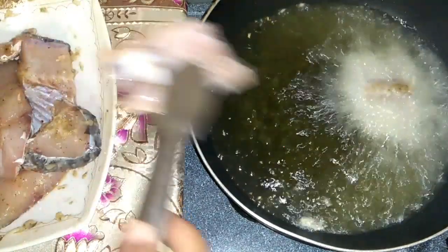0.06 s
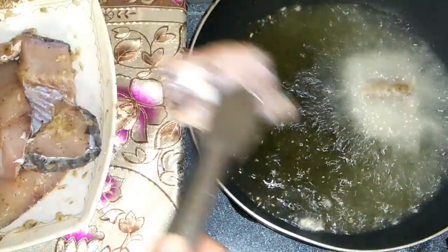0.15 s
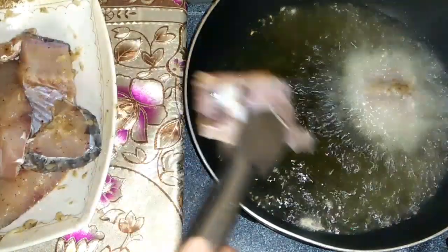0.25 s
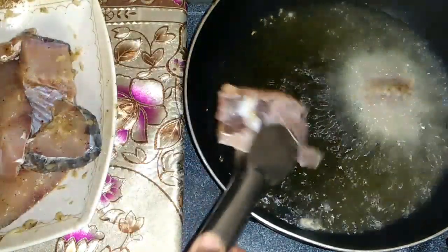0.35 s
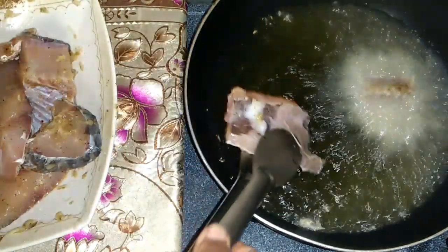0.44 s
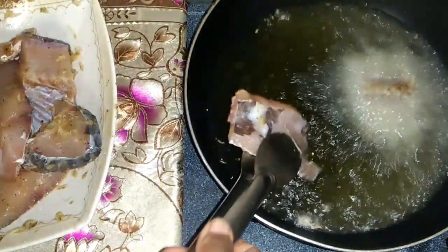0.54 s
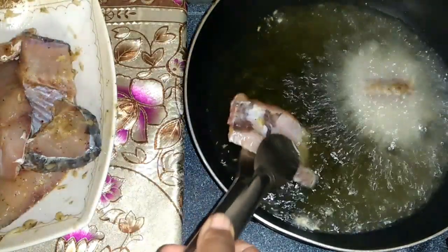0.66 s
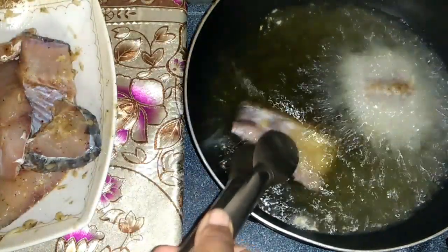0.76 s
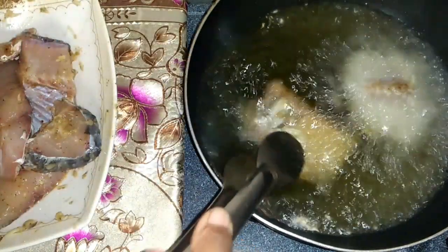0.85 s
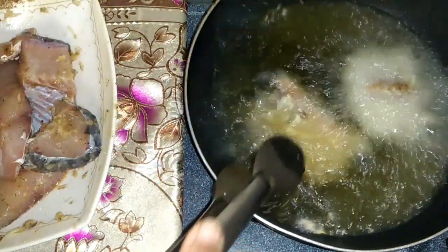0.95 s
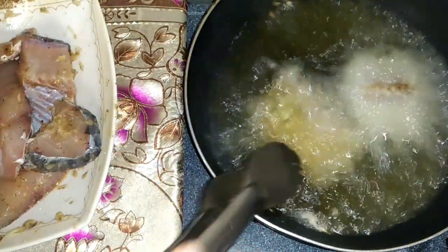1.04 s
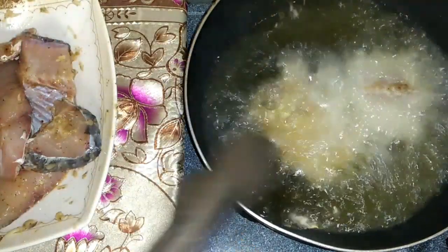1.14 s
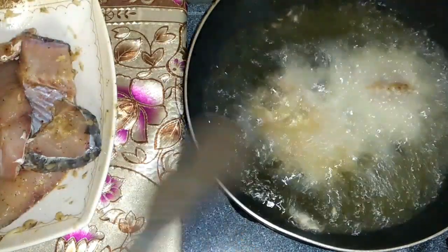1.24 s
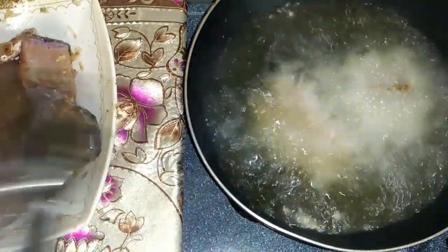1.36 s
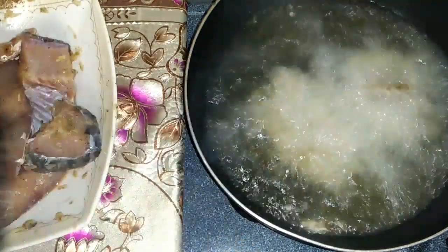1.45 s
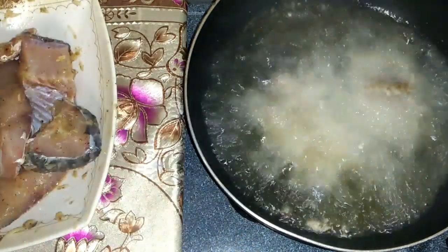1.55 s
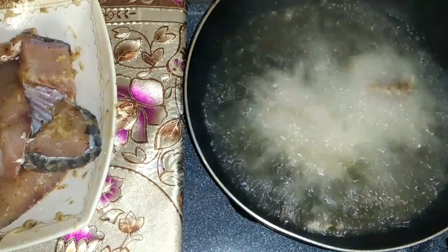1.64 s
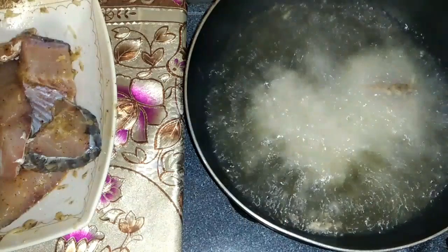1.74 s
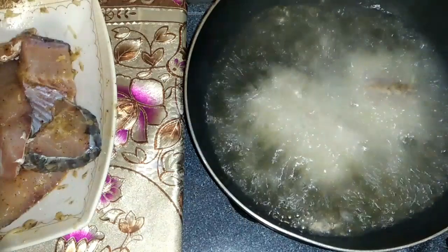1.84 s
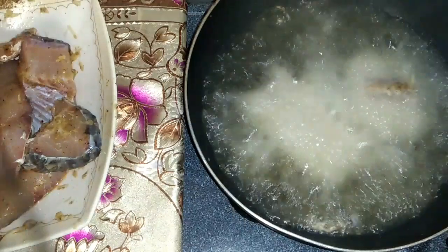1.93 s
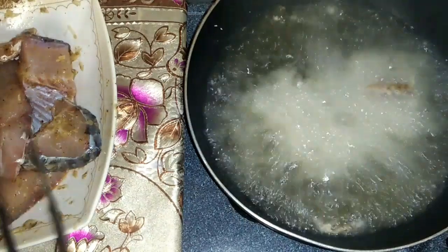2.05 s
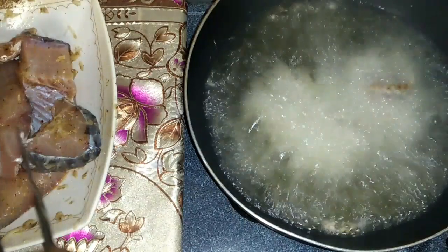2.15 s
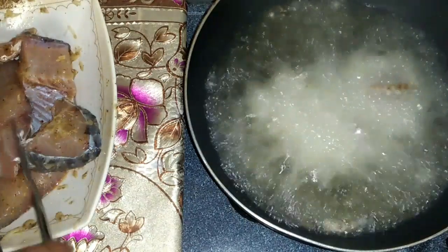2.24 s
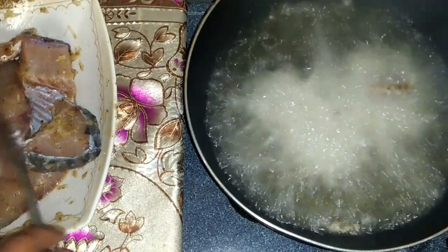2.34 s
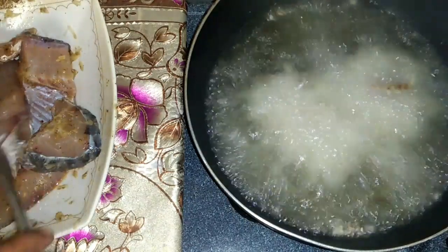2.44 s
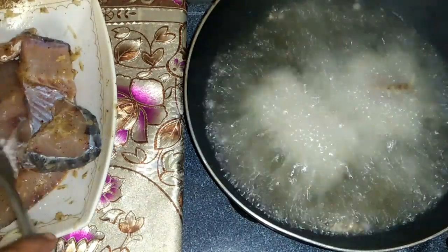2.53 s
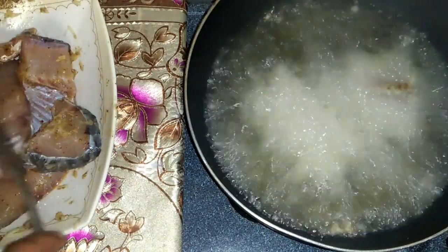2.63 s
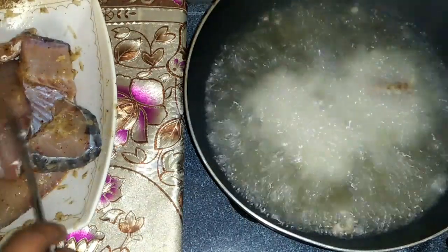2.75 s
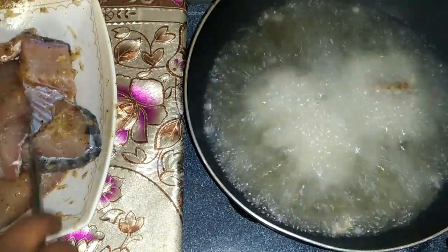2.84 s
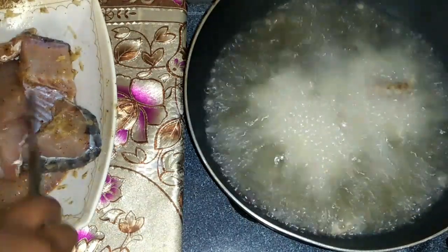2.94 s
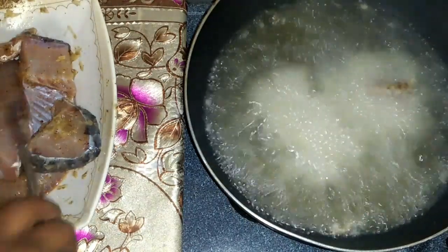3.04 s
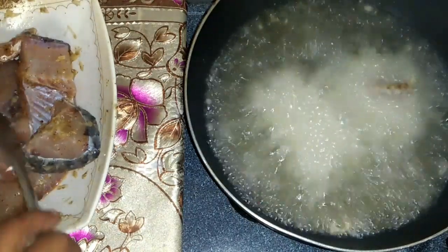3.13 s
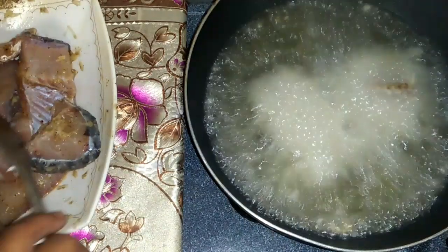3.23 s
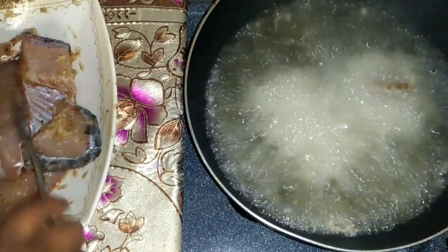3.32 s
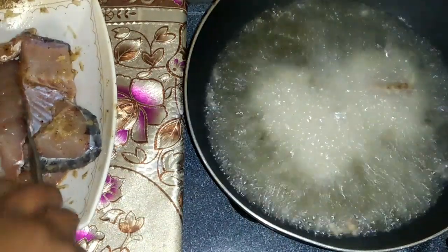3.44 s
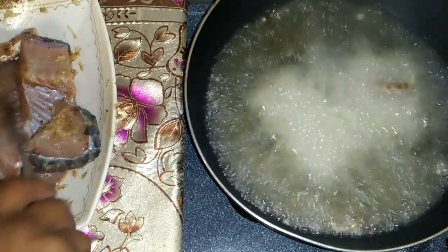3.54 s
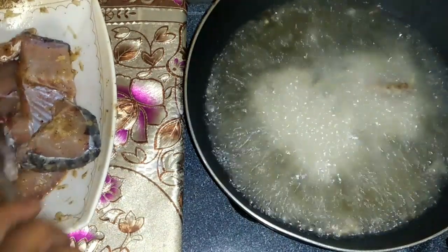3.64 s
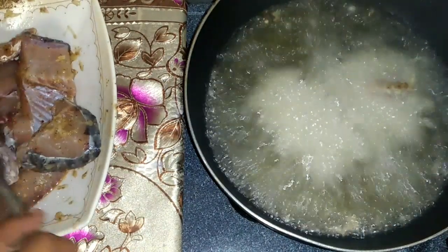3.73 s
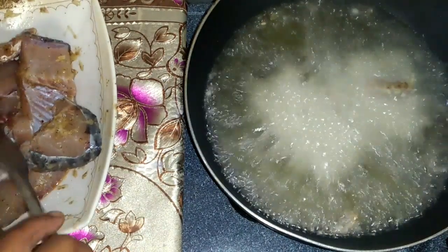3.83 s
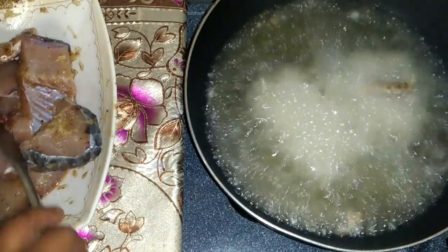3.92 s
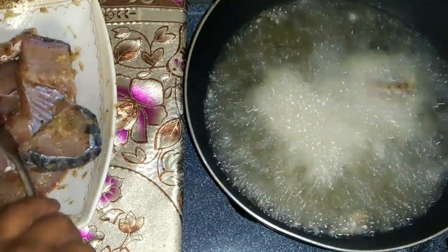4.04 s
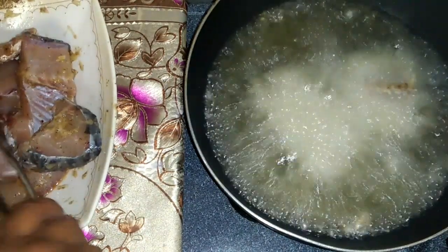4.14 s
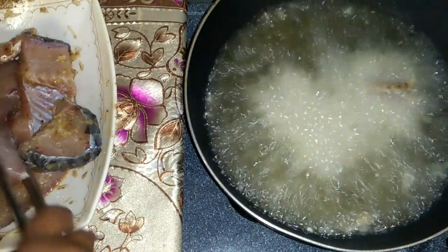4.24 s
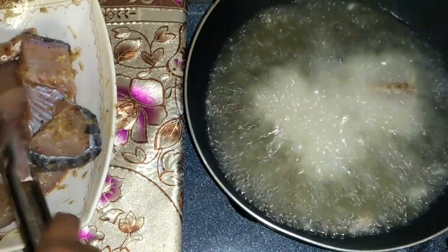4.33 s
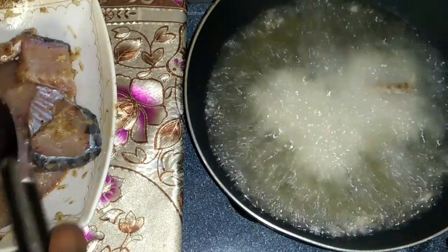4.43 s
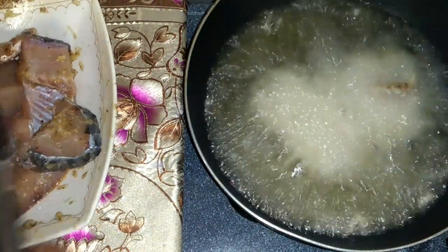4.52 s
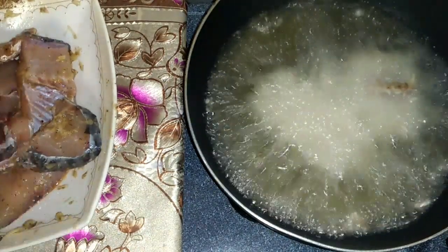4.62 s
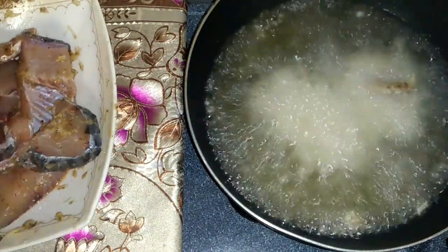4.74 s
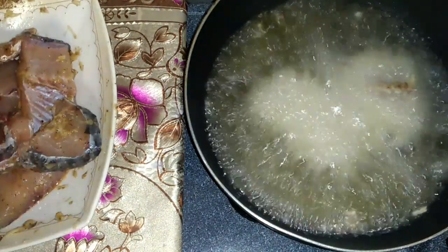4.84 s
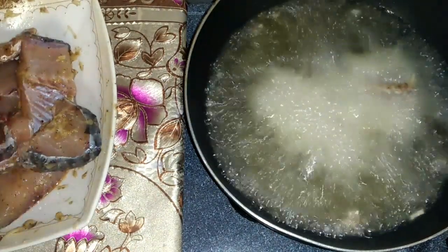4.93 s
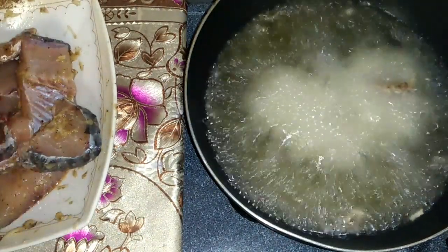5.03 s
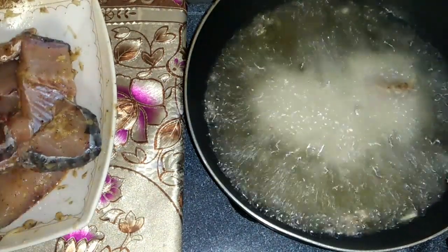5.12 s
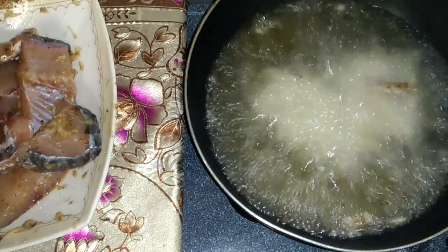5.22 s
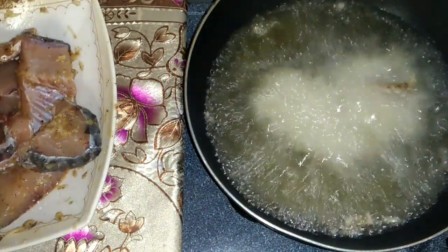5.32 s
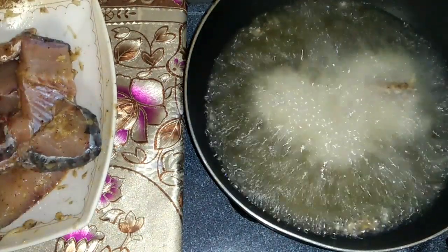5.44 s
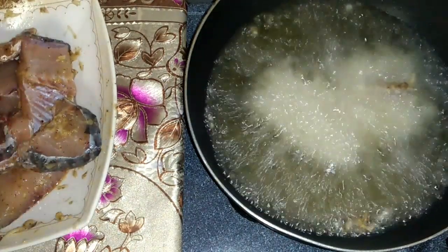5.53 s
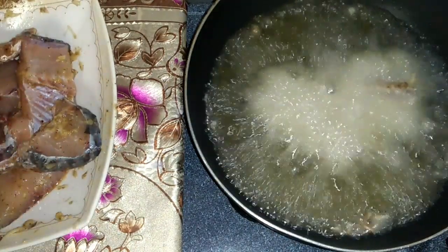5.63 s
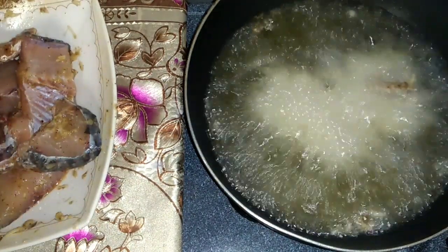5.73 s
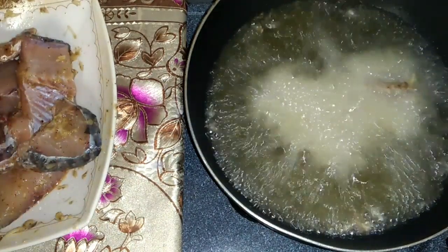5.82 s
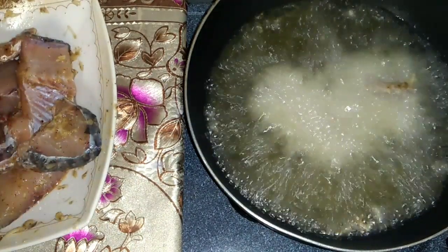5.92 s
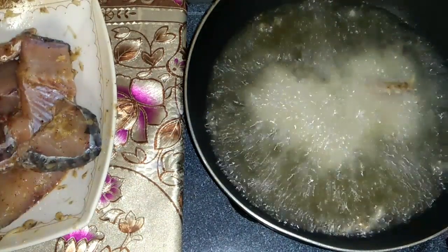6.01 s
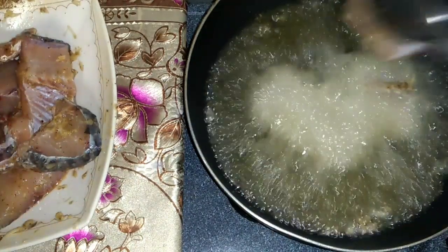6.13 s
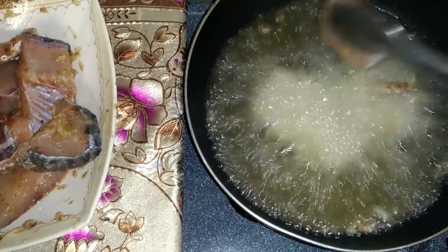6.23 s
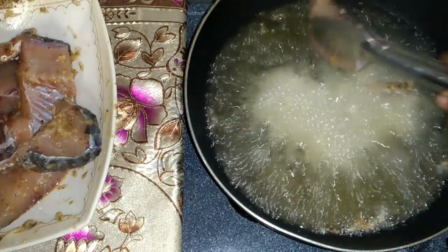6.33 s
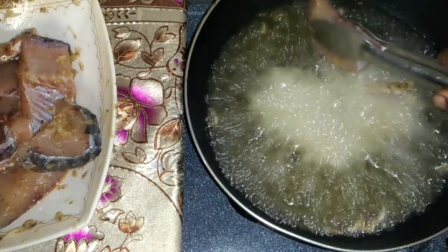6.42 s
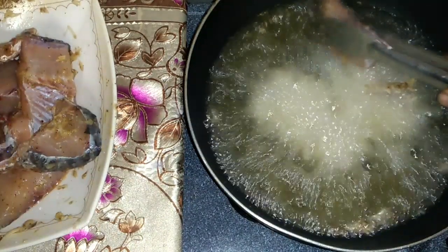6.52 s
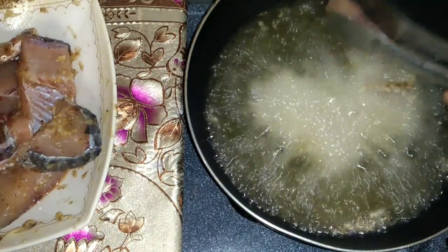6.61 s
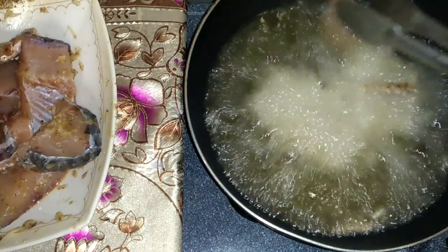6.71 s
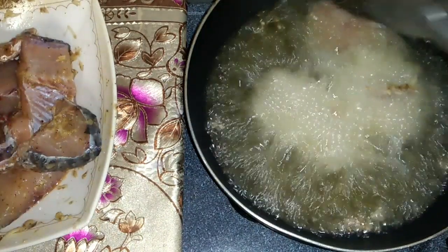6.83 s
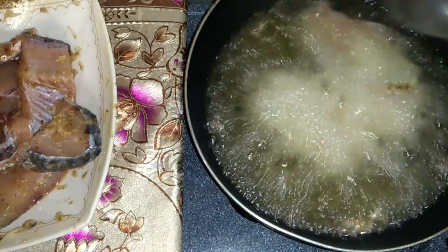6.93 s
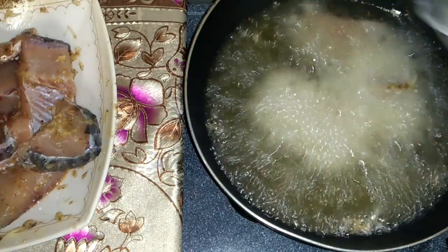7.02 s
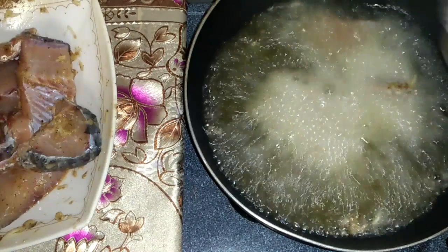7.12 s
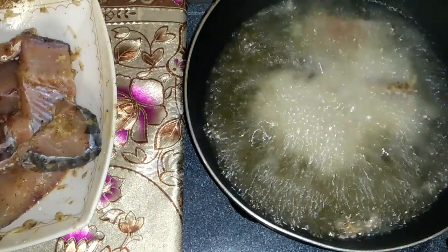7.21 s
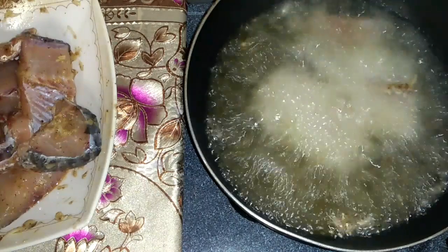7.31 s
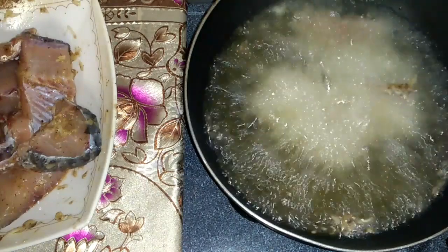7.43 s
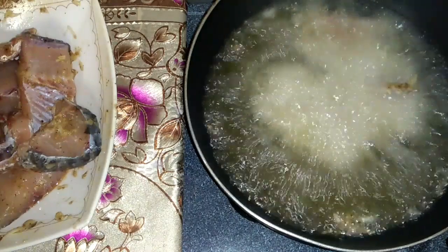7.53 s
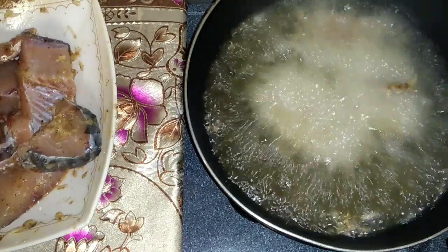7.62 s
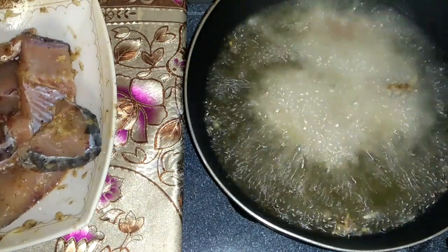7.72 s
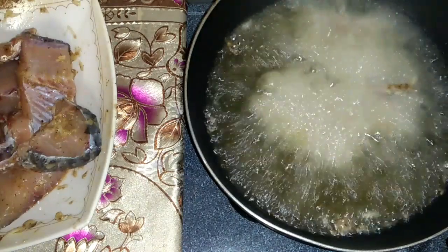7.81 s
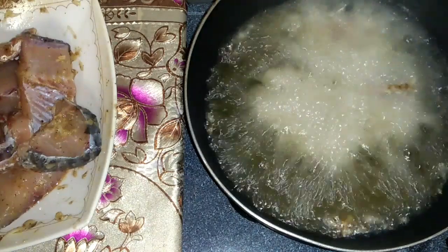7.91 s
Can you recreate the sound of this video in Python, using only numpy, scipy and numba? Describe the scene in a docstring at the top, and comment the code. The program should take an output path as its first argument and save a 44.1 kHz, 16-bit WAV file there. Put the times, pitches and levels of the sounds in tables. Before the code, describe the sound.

Fish fries in a deep pan of hot oil, heard close up in a small kitchen. At first there is a light, fizzing sizzle with scattered pops and spits. At about 0.8 seconds a fresh piece goes in and the boil leaps up, loud and dense, with gurgling large bubbles, spitting small ones and a bright hiss, strongest from 1.3 to 2 seconds. By 3 seconds it has eased into steady frying, dotted with irregular pops and sharp cracks of spattering oil. Near 7 seconds another piece adds a wet crackle and a smaller lift, and the frying carries on to the end at about 8 seconds. The pan and room ring faintly with the bursts. Underneath, the oil churns over a faint dull rumble, and a low hum swells from about 4 seconds, peaking near 6.5. The pan sits centrally, its high fizz spreading left and right.

```python
"""Hot oil sizzles and pops: fish fries in a deep pan in a small kitchen. A fresh piece goes in near 0.8 s
and the boil leaps up; another crackles wetly near 7 s. Steam bubbles burst at the surface: large ones
gurgle, smaller ones spit, the finest fizz, and spatters of oil crack above them. The pan and kitchen
ring with the bursts. Underneath, the oil churns over a dull rumble and a low hum swells in the room."""
import sys
import numpy as np
from scipy import signal
from scipy.io import wavfile
from scipy.ndimage import uniform_filter1d
from numba import njit

SR = 44100
rng = np.random.default_rng(int(sys.argv[2]) if len(sys.argv) > 2 else 0)


def wav_out(sig):
    """Save sig, one row per channel (or a flat mono array), as 16-bit PCM at SR to the path in sys.argv[1]."""
    wavfile.write(sys.argv[1], SR, np.round(np.clip(np.atleast_2d(sig).T, -1, 1) * 32767).astype(np.int16))


N = 351300
HOP = 64  # samples per modulation step


def gain_of(db):
    """Decibels to a factor."""
    return 10 ** (np.asarray(db) / 20)


def unit_rms(x):
    """Scales to rms 1."""
    return x / np.sqrt(np.mean(x ** 2) + 1e-20)


def curve(rows, column=1):
    """One column of an automation table at every sample."""
    rows = np.array(rows)
    return np.interp(np.arange(N) / SR, rows[:, 0], rows[:, column])


def wander(per_s, count=1):
    """Rows of drift-free random modulation near the given rate; rms 1, one value per HOP."""
    size = max(round(SR / HOP / per_s), 1)
    noise = rng.standard_normal((count, N // HOP + 9))
    slow = uniform_filter1d(uniform_filter1d(noise, size), size)
    return unit_rms(slow - uniform_filter1d(slow, 8 * size))


def swells(per_s):
    """One random modulation curve at every sample."""
    return np.repeat(wander(per_s)[0], HOP)[:N]


def equalise(x, points):
    """Minimum-phase EQ through (frequency [Hz], gain [dB]) points."""
    hz, db = np.transpose(points)
    grid = abs(np.fft.fftfreq(16384, 1 / SR))
    eq_db = np.clip(np.interp(np.log(grid + 1), np.log(hz), db), -100, 20)
    response = np.exp(np.conj(signal.hilbert(np.log(gain_of(eq_db)))))
    taps = np.fft.ifft(response).real[:4096]
    return signal.oaconvolve(np.atleast_2d(x), taps[None], axes=1)[:, :N]


def resonate(x, hz, width):
    """A resonance with a gain of about 1 at its centre."""
    r = np.exp(-np.pi * width / SR)
    return 2 * signal.lfilter([1 - r], [1, -r * np.exp(2j * np.pi * hz / SR)], x).real


def band(x, hz, width):
    """Two resonances in series, for steeper skirts."""
    return resonate(resonate(x, hz, width), hz, width)


# Tone of the rumble: (frequency [Hz], gain [dB])
RUMBLE_EQ = [(30, -16.5), (44, -20), (75, -13.5), (86, -9.5), (100, -15.5), (122, -9.5), (150, -12),
             (178, -15), (205, -24), (260, -68), (440, -120)]
# Fader ride of the rumble: (time [s], level [dB])
RUMBLE_LEVEL = [(0.0, -77), (0.69, -60), (1.26, -65.5), (1.48, -55), (3.1, -62), (3.53, -55.5), (6.88, -53),
                (7.5, -61), (7.97, -55)]


def rumble():
    """A dull bed of low noise in uneven swells."""
    noise = unit_rms(equalise(rng.standard_normal(N), RUMBLE_EQ))
    return noise * gain_of(curve(RUMBLE_LEVEL) + 2 * swells(per_s=18))


# Fader ride of the room's hum: (time [s], level [dB])
HUM_LEVEL = [(0.0, -56), (0.38, -76), (0.89, -51), (0.95, -61), (1.6, -66), (2.11, -46.5), (2.62, -50),
             (3.08, -86), (3.57, -48), (3.64, -59), (4.01, -39.5), (4.26, -54), (4.39, -42.5), (4.86, -48),
             (4.88, -42.5), (6.43, -28.5), (7.41, -40.5), (7.45, -34), (7.56, -55), (7.61, -36),
             (7.63, -33), (7.72, -50), (7.81, -31), (7.97, -49.5)]


def hum(hz=56.8, waver_hz=0.58, flutter_db=0.5):
    """A low tone that wavers and flutters, with a faint fuzz under it."""
    turns = np.cumsum(hz + waver_hz * swells(per_s=8.4)) / SR
    tone = np.sqrt(2) * np.sin(2 * np.pi * turns) * gain_of(flutter_db * swells(per_s=8.5))
    fuzz = gain_of(-13) * unit_rms(band(rng.standard_normal(N), hz=48, width=24))
    return (tone + fuzz) * gain_of(curve(HUM_LEVEL))


def echoes(x, t60_s):
    """A short tail of scattered reflections, energy 1."""
    t = np.arange(8000) / SR
    reflections = rng.standard_normal(len(t)) * (rng.random(len(t)) < .3)
    tail = reflections * gain_of(-60 * t / t60_s) * (t > .003)
    return signal.oaconvolve(x, tail[None] / np.linalg.norm(tail), axes=1)[:, :N]


# Resonances of pan and kitchen: (frequency [Hz], width [Hz], gain [dB])
RINGS = [(442, 36, -17), (582.6, 8.4, -0.5), (704, 7.9, 2), (755, 4.9, 6), (873.6, 8.6, 5), (926, 5, -1),
         (922, 134, -11.5), (1026, 3.2, 3), (1230, 5.8, -4), (2050, 9.7, -2.5)]


def ringing(x):
    """The pan and kitchen ring along with the bursts."""
    return sum(gain_of(db) * resonate(x, hz, width) for hz, width, db in RINGS)


# Tone of the churning oil: (frequency [Hz], gain [dB])
CHURN_EQ = [(130, -33), (220, -15), (280, -1.5), (333, 0.5), (371, -16), (415, 4.5), (500, -1.5),
            (650, -39.5), (1100, -120)]


def churn():
    """Oil churns unevenly against the pan, riding the boil; deep pops lift it with the large bubbles."""
    large_db = curve(BOIL, 1)
    lift_db = stirred(large_db) - large_db
    noise = unit_rms(equalise(rng.standard_normal(N), CHURN_EQ))
    return noise * gain_of(curve(BOIL, 6) + lift_db + 2 * swells(per_s=18))


@njit
def bubbles(peak_s, gain, hz, cycles, side, glide):
    """Each bubble swells, rings a few cycles with climbing pitch and dies; rows are mid and side."""
    mix = np.zeros((2, N))
    for k in range(len(peak_s)):
        rise = cycles[k] / 1.7 * SR / hz[k]  # samples to the peak; half height lasts 1.7 times as long
        start = int(peak_s[k] * SR - rise)
        for n in range(max(-start, 0), min(int(4.5 * rise), N - start)):
            age = n / rise
            phase = 2 * np.pi * hz[k] / SR * (n - rise) * (1 + glide * (age - 1))
            wave = gain[k] * (age * np.exp(1 - age)) ** 2 * np.cos(phase)
            mix[0, start + n] += wave
            mix[1, start + n] += side[k] * wave
    return mix


def zone(pitch):
    """Which of five pitch zones a bubble falls in."""
    return np.clip(pitch * 1.2 + 2.5, 0, 4).astype(int)


def blur(centre_hz, octaves, clumps_db):
    """Bursts too small and many to tell apart: a wide wash of noise around the centre pitch."""
    hz, frames = np.fft.rfftfreq(256, 1 / SR)[:, None] + 1, N // HOP + 5
    pitch = np.log2(hz / np.resize(centre_hz[::HOP], frames)) / octaves
    clumps = gain_of(np.take_along_axis(clumps_db[:, :frames], zone(pitch), 0))
    shape = np.exp(-(pitch / 2.2) ** 2) * clumps
    real, imag = rng.standard_normal((2, 2, len(hz), frames))
    return signal.istft((real + 1j * imag) * shape, nperseg=256, noverlap=256 - HOP)[1][:, :N]


# Colour that pan and microphone give every swarm: (frequency [Hz], gain [dB])
SWARM_EQ = [(180, -32), (300, -0.5), (370, -40), (415, -2), (528, -13), (573, -2), (760, -2), (901, -0.5),
            (1110, -0.5), (2120, -3.5), (4840, -7), (13600, -17), (14300, -9.5)]


def swarm(level_db, centre_hz, surge, octaves, cycles, size_spread, clumping, blur_db, count):
    """Random bursts of many pitches, most weak, a few strong; they come up in clumps of like size."""
    when, size, place = rng.random((count, 3)).T
    pitch, length = rng.standard_normal((count, 2)).T
    at, centre_hz = (when * (N - 1)).astype(int), centre_hz * np.ones(N)
    step = at // HOP
    hz = np.clip(centre_hz[at] * 2 ** (octaves * pitch), 300, 16000)
    # Above -37.5 dB a swarm is so dense that its clumps and sizes even out.
    uneven = np.clip(0.5 - 0.02 * (level_db[::HOP] + 37.5), .3, 1)
    clumps_db = clumping * np.resize(uneven, len(surge[0])) * (wander(24, count=5) + 0.68 * surge)
    size_db = -size_spread * np.minimum(2 * uneven[step], 1) * np.log(size + .012)
    gain = gain_of(size_db + clumps_db[zone(pitch), step]) * np.sqrt(hz)
    bursts = bubbles(at / SR, gain, hz, cycles * np.exp(0.54 * length), np.sign(place - .5), glide=.012)
    bursts = unit_rms(equalise(bursts, SWARM_EQ))
    wash = unit_rms(equalise(blur(centre_hz, octaves, clumps_db), SWARM_EQ))
    return gain_of(level_db) * unit_rms(bursts + gain_of(blur_db) * wash)


def stirred(level_db, below_hz=1500, stir_db=-23.5, t60_s=0.15):
    """Adds to a boil level the short flurry of bubbles that each deep pop stirs up."""
    peak_s, db, hz, _ = np.array(POPS, float).T
    kicks, t = np.zeros(N), np.arange(SR // 2) / SR
    np.add.at(kicks, (peak_s * SR).astype(int), (hz < below_hz) * gain_of(db + stir_db) ** 2)
    flurry = signal.oaconvolve(kicks, gain_of(-60 * t / t60_s) ** 2)[:N]
    return 10 * np.log10(gain_of(level_db) ** 2 + abs(flurry))


# Fader ride of the piece that goes in near 7 s: (time [s], level [dB])
FRESH_LEVEL = [(6.85, -70), (7.0, -44), (7.12, -35), (7.2, -41), (7.35, -42), (7.5, -42), (7.6, -43),
               (7.68, -36), (7.76, -53), (7.97, -60)]


def fresh_piece(surge):
    """Fresh fish crackles wetly in a narrow range of bubble sizes."""
    return swarm(curve(FRESH_LEVEL), 3160, surge, octaves=0.25, cycles=11,
                 size_spread=6, clumping=4, blur_db=-7, count=5000)


# How hard each bubble size boils:
# (time [s], large [dB], middle [dB], small [dB], fine [dB], middle pitch [Hz], churn [dB])
BOIL = [(0, -57, -49, -55, -46, 1930, -64), (.3, -48.5, -48, -50.5, -41.5, 2340, -60.5),
        (.55, -51, -48.5, -56, -46.5, 1870, -71), (.79, -50, -45, -49.5, -47, 1910, -57),
        (.83, -46.5, -35.5, -50, -31, 2550, -59), (.9, -39.5, -27, -25.5, -29, 2750, -60),
        (.99, -44.5, -32, -40, -33, 2310, -52), (1.04, -35, -27, -45, -31.5, 2250, -49),
        (1.07, -37, -25, -34, -32, 1930, -55), (1.2, -36.5, -28, -31.5, -30.5, 2000, -47.5),
        (1.35, -29, -28, -28.5, -30, 2120, -46), (1.5, -31.5, -25, -27, -25, 2060, -49),
        (1.84, -26, -26, -30.5, -26.5, 2120, -44.5), (2.0, -27.5, -30, -36.5, -28.5, 1990, -46),
        (2.2, -29.5, -33, -36, -29, 1990, -47.5), (2.4, -31.5, -38.5, -41, -32, 1940, -49),
        (2.57, -37, -39.5, -43, -37, 1880, -53.5), (2.73, -43.5, -37.5, -50, -37, 1890, -54),
        (3.05, -41, -40.5, -47, -37.5, 1910, -58), (3.3, -42, -42.5, -45, -39.5, 1930, -56),
        (3.7, -41.5, -43, -44.5, -41.5, 1880, -57.5), (4.1, -39, -40.5, -48, -42, 1910, -54.5),
        (4.44, -38.5, -39.5, -45.5, -41.5, 1940, -55), (4.75, -38, -42, -47, -45.5, 1850, -51),
        (5.0, -42, -42, -47.5, -45, 1850, -52), (5.3, -48, -40.5, -53, -42, 1770, -54.5),
        (5.6, -43, -43.5, -46.5, -37, 1780, -53.5), (6.1, -41, -42, -51, -41, 2090, -48),
        (6.5, -44.5, -41, -49, -41, 1880, -52.5), (6.9, -43.5, -38.5, -45.5, -43.5, 1810, -52.5),
        (7.03, -35, -41.5, -46.5, -36, 2100, -51.5), (7.3, -43.5, -37, -48, -36.5, 2090, -52),
        (7.55, -43, -38, -45, -33, 2090, -59), (7.75, -40, -36.5, -46, -32, 2010, -48.5),
        (7.97, -46, -36.5, -52, -35.5, 2050, -51.5)]


def sizzle():
    """Each bubble size swells on its own curve; quick surges of steam lift all swarms together."""
    surge = wander(per_s=30)
    large_db, middle_db, small_db, fine_db = (curve(BOIL, k) + 0.7 * swells(5.4) for k in (1, 2, 3, 4))
    large = swarm(stirred(large_db), 915, surge, octaves=0.35, cycles=2,
                  size_spread=3.5, clumping=3.5, blur_db=-6, count=5000)
    middle = swarm(middle_db, curve(BOIL, 5), surge, octaves=0.5, cycles=3.5,
                   size_spread=3.5, clumping=3.5, blur_db=-4.5, count=16000)
    small = swarm(small_db, 4650, surge, octaves=0.71, cycles=7.5,
                  size_spread=4, clumping=2.5, blur_db=-0.5, count=8000)
    crackle = fresh_piece(surge)
    fine = swarm(fine_db, 11040, surge, octaves=0.41, cycles=6.4,
                 size_spread=3.5, clumping=2.9, blur_db=3.5, count=16000)
    return large + middle + small + crackle + fine


# Spatters of oil:
# (time [s], level [dB], centre [Hz], nominal width [Hz], spray length [ms], relative fizz level [dB])
SPATTERS = [(0.071, -16.5, 9700, 5420, 0.5, -23), (0.2267, -23, 8050, 3700.0, 2.9, -15),
            (0.2436, -24, 8350, 2200.0, 0.5, -20), (0.5434, -33, 12000.0, 4400.0, 0.3, -17.0),
            (0.5568, -21, 11100, 4700.0, 0.3, -18), (0.678, -24, 11100, 4500.0, 0.3, -19),
            (1.0373, -12.5, 9600.0, 4600.0, 1.9, -28), (1.047, -19, 10300.0, 5400.0, 1.2, -24),
            (1.352, -13.0, 12500.0, 3500.0, 0.4, -15), (1.5856, -5, 9400, 3400.0, 0.42, -26),
            (2.2086, -15, 12000.0, 4800.0, 0.7, -15), (2.3696, -15, 11300.0, 3300.0, 0.5, -21),
            (2.7085, -24, 8300.0, 3100.0, 0.3, -16), (2.762, -15.5, 12800.0, 3000.0, 0.6, -17.0),
            (2.7797, -21, 9900.0, 4200.0, 0.4, -15), (2.9944, -27, 12200.0, 4000.0, 1.3, -17.0),
            (3.032, -9.5, 10500, 5900, 2.2, -23), (3.0575, -16, 9200, 3300.0, 0.3, -16),
            (3.096, -23, 11100.0, 3200.0, 0.4, -17.0), (3.1064, -19.5, 9300.0, 4400.0, 0.7, -16),
            (3.477, -26, 10300.0, 4300.0, 0.3, -20), (3.554, -16.5, 12400.0, 3900.0, 0.68, -20),
            (3.582, -27, 11700.0, 4300.0, 0.3, -15), (3.928, -27, 8300.0, 4800.0, 1.7, -22),
            (4.786, -25.5, 8040, 3900.0, 1.8, -11), (5.05, -19, 11000, 6500, 0.2, -22),
            (5.1455, -27, 10600, 3700.0, 0.3, -17.0), (5.1605, -26, 8850, 2400, 0.4, -20),
            (5.1657, -25, 8700.0, 2400.0, 1.4, -13), (5.2308, -26, 8700, 2400, 0.4, -16),
            (5.2551, -24, 8100, 2400, 0.5, -17), (5.2972, -24, 5600.0, 3400.0, 0.4, -24),
            (5.3705, -28, 8200.0, 3100.0, 0.3, -15), (5.4127, -13.5, 7200.0, 4800.0, 0.7, -35),
            (5.4237, -22, 9600.0, 2700.0, 0.87, -29), (5.443, -22, 8300.0, 1900.0, 0.5, -23),
            (5.5204, -22, 8300.0, 2800.0, 0.9, -18), (5.5719, -13, 6600.0, 4630, 1.3, -22),
            (5.714, -25, 8900.0, 2000.0, 0.6, -27), (5.7979, -16, 8600, 2800.0, 0.63, -15),
            (5.8043, -28, 9200.0, 2200.0, 1.9, -15), (6.327, -22, 9200.0, 5100.0, 1.0, -18),
            (6.343, -19, 12500.0, 3700.0, 1.2, -26), (6.4913, -16, 8600.0, 5000.0, 1.9, -23),
            (6.6453, -26, 12700.0, 3600.0, 0.6, -16), (6.6564, -24.5, 12400.0, 2580, 0.7, -15),
            (6.6624, -30, 9900.0, 2800.0, 0.9, -17.0), (6.6702, -27, 11300.0, 2800.0, 0.4, -20),
            (6.8014, -27, 10100.0, 6300.0, 0.3, -14), (6.886, -25.5, 7800.0, 2700.0, 0.3, -16),
            (6.9914, -24, 9600.0, 3200.0, 0.6, -20), (7.0117, -8.0, 11400.0, 2500.0, 0.5, -34),
            (7.0207, -23, 8600.0, 2700.0, 0.7, -29), (7.2879, -20, 8500.0, 3400.0, 0.7, -19),
            (7.299, -22, 9000.0, 3600.0, 1.1, -18), (7.739, -14.5, 9450, 2400.0, 0.7, -16.5),
            (7.772, -19, 11300.0, 5000.0, 1.5, -23)]


def spatters(lead_in_s=0.0014, fizz_t60_s=0.16, side=0.59):
    """A sharp crack amid a short spray of tiny bursts; the droplets fall back and fizz on faintly."""
    length, lead = 6000, 200  # samples in all, and before the crack
    out, t = np.zeros((2, N + length)), (np.arange(length) - lead) / SR
    for at_s, db, hz, width, spray_ms, fizz_db in SPATTERS:
        noise = rng.standard_normal((2, length))
        swell = np.exp(np.minimum(t, 0) / lead_in_s)
        spray = noise * np.where(t < 0, swell, gain_of(-8 * (1000 * t / spray_ms) ** 4))
        crack = (t == 0) * np.sign(noise[:, :1]) * gain_of(6) * np.sqrt(SR / width)
        burst, hiss = band(np.array([spray + crack, noise]), hz, 1.4 * width)
        fizz = unit_rms(hiss) * gain_of(fizz_db - 60 * t / fizz_t60_s) * np.clip(t / 0.0027, 0, 1)
        sound = gain_of(db) * (burst / abs(burst[0]).max() + fizz)
        start = round(at_s * SR) - lead
        out[:, start:start + length] += sound * [[1], [side]]
    return out[:, :N]


# Loud bubbles, often several to a burst: (peak time [s], level before EQ [dB], pitch [Hz], length [cycles])
POPS = [(0.0852, -37.5, 3800, 3.7), (0.1336, -32, 4930, 13), (0.1427, -32, 4380, 11),
        (0.1495, -30, 1630, 7.1), (0.1734, -27.5, 2330, 4.6), (0.277, -24, 2650, 8.7),
        (0.4222, -34, 4200, 14), (0.4602, -38, 4030, 11), (0.5033, -31, 4650, 18), (0.5333, -29, 1900, 4.7),
        (0.567, -21, 1350, 4.1), (0.5691, -20.5, 690, 2.8), (0.5798, -17.5, 1650, 2.3),
        (0.61, -35, 1580, 7), (0.6224, -28, 740, 4.1), (0.6315, -24, 2060, 5.1), (0.6449, -36, 4360, 11),
        (0.6723, -19, 740, 1.8), (0.6988, -36, 5470, 6.6), (0.7304, -14.5, 1420, 2.8),
        (0.7314, -17, 2000, 4.3), (0.7322, -16.5, 720, 2.1), (0.8357, -22, 2780, 9.1),
        (0.868, -22, 3000, 5), (0.885, -14, 2520, 6.3), (0.889, -17, 2050, 6), (0.8978, -13.5, 2820, 6.4),
        (0.91, -19, 4140, 8), (0.9178, -12, 3300, 4), (0.9298, -17, 1880, 6.9), (0.9672, -14.5, 4040, 3),
        (0.9895, -17, 3050, 4.6), (1.008, -19, 3970, 9.7), (1.0193, -18, 1760, 5.5),
        (1.0529, -13.5, 880, 3.4), (1.0641, -13, 960, 2), (1.0704, -8, 1770, 2.3), (1.0787, -14, 1700, 4.4),
        (1.1176, -11, 2740, 3.2), (1.1298, -18, 1070, 4.6), (1.1412, -15, 2500, 4.5),
        (1.147, -18, 870, 5.1), (1.162, -7, 1570, 6.7), (1.2443, -12, 1010, 2.6), (1.2507, -18.5, 4060, 20),
        (1.265, -15, 1010, 4.5), (1.2685, -12, 2180, 3), (1.296, -15, 920, 3.7), (1.311, -14, 860, 3),
        (1.3208, -14, 2420, 7), (1.334, -23, 890, 1.6), (1.335, -15, 1680, 9.6), (1.3558, -15, 1640, 5.4),
        (1.3633, -12, 920, 2.9), (1.3815, -12, 990, 2), (1.381, -9, 2300, 2), (1.4432, -6.5, 2400, 2.9),
        (1.466, -3, 1120, 1.7), (1.4798, -18, 910, 1), (1.527, -11, 1010, 2.3), (1.5276, -17, 2160, 6.9),
        (1.5478, -9, 925, 2.7), (1.5591, 0.5, 2110, 1.2), (1.5715, -5.5, 1010, 4.2), (1.5881, -6, 1010, 3),
        (1.6374, -14, 2970, 7.1), (1.6611, -9, 980, 3), (1.6723, -2.5, 1000, 1.4), (1.6998, -19, 3220, 5.3),
        (1.7361, -16.5, 2230, 12), (1.7435, -23, 1000, 1.4), (1.7837, -12.5, 2990, 6.4),
        (1.8, -15.5, 3450, 8.5), (1.8204, -17, 1550, 2.8), (1.8378, -10.5, 870, 1.6),
        (1.8415, -19, 5570, 7), (1.8425, -2, 1650, 1.3), (1.8683, 0, 1170, 0.88), (1.9266, -8, 1950, 2.1),
        (1.9444, -7, 1010, 1.6), (2.0683, -13, 2110, 2.4), (2.1244, -18.5, 3300, 6), (2.1312, -7, 920, 1.2),
        (2.1714, -21, 2230, 7), (2.1734, -17, 1590, 3.8), (2.1752, -22, 890, 2), (2.1827, -21, 3080, 4.5),
        (2.1986, -12.5, 910, 2.3), (2.1984, -21, 1510, 5.7), (2.2387, -16, 830, 6.3),
        (2.2618, -14, 860, 1.2), (2.2991, -13, 1480, 2.7), (2.3133, -17, 830, 2.5), (2.34, -15, 1710, 3.6),
        (2.3754, -17.5, 870, 5.8), (2.4056, -19, 1690, 5), (2.414, -14, 910, 2.5), (2.4767, -20, 1600, 3.2),
        (2.5493, -30, 3090, 5.2), (2.5541, -15, 910, 2.7), (2.5693, -28, 3130, 5.7), (2.5812, -36, 6420, 6),
        (2.6067, -8, 840, 2.1), (2.6897, -14, 915, 2), (2.7137, -34, 4480, 11), (2.7293, -30, 4340, 12),
        (2.7386, -13.5, 1450, 2.8), (2.7751, -24, 2320, 4), (2.8358, -19, 2450, 7),
        (2.889, -16.5, 895, 1.3), (2.8917, -23, 2700, 4.7), (2.9175, -9, 1000, 0.85),
        (2.9464, -26, 2960, 5.4), (3.048, -18.5, 990, 2.8), (3.0743, -13, 780, 2.8),
        (3.1882, -19, 865, 1.9), (3.2454, -20.5, 830, 4.7), (3.2605, -18, 840, 3.8),
        (3.2905, -23.5, 3130, 7.1), (3.3045, -23, 900, 2), (3.319, -22, 1540, 1.9), (3.343, -17, 1590, 5.9),
        (3.4194, -20.5, 850, 1.8), (3.442, -24, 1010, 3.2), (3.464, -27.5, 3640, 14),
        (3.495, -19.5, 2940, 2.1), (3.5098, -17, 1100, 3), (3.5172, -25, 1560, 3.4), (3.532, -16, 730, 1.5),
        (3.61, -20, 990, 6.1), (3.6232, -10.5, 930, 0.83), (3.663, -25.5, 3230, 7.8),
        (3.7061, -30, 2580, 8), (3.7234, -21, 990, 2), (3.7998, -21, 970, 3.3), (3.8694, -9.5, 1080, 1.7),
        (3.903, -19, 1720, 7.4), (3.9317, -23.5, 4150, 17), (3.9728, -16, 1010, 2.6),
        (3.9726, -27, 2300, 5.6), (3.9736, -28, 6110, 6), (4.047, -17.5, 1880, 3.9),
        (4.0891, -13, 990, 5.7), (4.177, -17, 915, 3.2), (4.177, -23, 1850, 2.3), (4.208, -22, 1620, 2.9),
        (4.2933, -19, 920, 6.1), (4.3072, -19, 930, 3.8), (4.3358, -37, 4840, 14), (4.378, -9, 1190, 0.63),
        (4.3876, -23, 1944, 22), (4.4446, -32, 4380, 14), (4.4519, -14, 876, 3.7), (4.512, -21.5, 1920, 11),
        (4.5094, -38, 4250, 12), (4.5163, -32, 6130, 7.3), (4.567, -17, 896, 5.8), (4.6207, -22, 1720, 2.5),
        (4.6346, -36, 2330, 3.9), (4.6572, -34, 2340, 3.8), (4.753, -19, 975, 7.3),
        (4.7526, -20.5, 1380, 13), (4.7585, -17, 990, 1.4), (4.8005, -26, 1400, 9), (4.8114, -22, 1380, 11),
        (4.844, -11.5, 920, 0.99), (4.8931, -29, 3080, 6), (4.8988, -19.5, 876, 2.6),
        (4.9626, -21, 1000, 1.6), (5.0184, -13, 920, 2.5), (5.021, -34, 4400, 18), (5.0234, -24, 2460, 3.7),
        (5.0498, -31, 890, 2.3), (5.0567, -16, 970, 1.6), (5.0698, -20, 1480, 4.3), (5.08, -20, 1410, 7.9),
        (5.189, -15, 1250, 4.7), (5.2089, -26, 1430, 4), (5.2345, -20, 1390, 3.5),
        (5.298, -21.5, 2200, 6.3), (5.2973, -12, 970, 2.5), (5.2974, -11, 4800, 2.2),
        (5.33, -24, 3620, 5.4), (5.3307, -20, 950, 2.7), (5.4131, -6.5, 1290, 2.3),
        (5.4144, -19.5, 2290, 8.2), (5.4147, -14.5, 4200, 2.5), (5.5316, -38, 6450, 8),
        (5.5713, -16, 740, 1.4), (5.5713, -15.5, 5100, 3.5), (5.5734, -17.5, 4200, 6.2),
        (5.5922, -23.5, 1400, 13), (5.6809, -25.5, 1930, 7.9), (5.7774, -25, 1390, 11),
        (5.7923, -15.5, 1170, 2.2), (5.829, -22.5, 3100, 8.8), (5.839, -22, 5300, 6.4),
        (5.8937, -8.5, 1090, 1.9), (5.8936, -16, 2050, 5.8), (5.8942, -10.5, 3000, 1.6),
        (5.912, -23, 2090, 8.1), (5.9759, -15.5, 940, 3.4), (5.992, -16, 4150, 1.1),
        (6.108, -22.5, 920, 3.9), (6.1578, -11.5, 1070, 2.9), (6.1977, -15, 880, 1.8),
        (6.2234, -22, 900, 4.2), (6.2684, -14, 1020, 1.3), (6.2837, -26, 990, 2.6),
        (6.3401, -27, 4570, 5.9), (6.3414, -20.5, 870, 1.9), (6.3634, -20, 1940, 4.4),
        (6.4922, -14, 1330, 3.5), (6.4946, -15.5, 4100, 1.7), (6.5121, -13.5, 1010, 1.2),
        (6.512, -13, 1880, 1.5), (6.546, -22, 980, 1.2), (6.7246, -19.5, 1304, 9.8),
        (6.757, -20, 1150, 3.5), (6.848, -21, 1840, 9.3), (6.8644, -22, 970, 2.9), (6.8874, -18, 1460, 2.6),
        (6.903, -25.5, 5160, 13), (6.9446, -30, 6050, 5.5), (6.9606, -10, 1120, 1.4),
        (6.967, -16, 1050, 2.3), (6.9878, -19, 1010, 4.2), (7.005, -23, 3560, 4), (7.013, -20, 3100, 8.9),
        (7.0249, -31, 6150, 6.7), (7.0533, -12, 1100, 2.3), (7.0627, -15.5, 3140, 3.9),
        (7.0661, -26, 6310, 7), (7.1117, -20, 2970, 6.5), (7.1237, -14, 3130, 2.9), (7.144, -18, 1560, 3.5),
        (7.1728, -20, 2720, 3.5), (7.2327, -15, 2350, 1.4), (7.234, -8.5, 1010, 1.15),
        (7.2374, -26, 3160, 14), (7.268, -17, 1660, 2.7), (7.27, -17.5, 2560, 7.9), (7.2987, -19, 910, 4.6),
        (7.3133, -12.5, 4500, 2.3), (7.361, -23, 2740, 2.8), (7.4325, -20, 2720, 5.1),
        (7.499, -14, 3060, 8.3), (7.514, -21.5, 860, 4.1), (7.5289, -22, 3240, 11), (7.5387, -22, 3140, 9),
        (7.5897, -23.5, 4130, 10.2), (7.6134, -15, 1350, 1.9), (7.6403, -22, 880, 3.9),
        (7.6464, -29, 4550, 9), (7.6696, -15, 3300, 3.4), (7.684, -19, 3100, 3.9), (7.7355, -26, 3290, 7.8),
        (7.7545, -3.5, 980, 2), (7.768, -19, 900, 6.8), (7.8183, -26, 3060, 7.5), (7.8207, -17, 970, 3.6),
        (7.9424, -17.5, 970, 6)]
# Tone of the loud bubbles, thin in the bass: (frequency [Hz], gain [dB])
POP_EQ = [(100, -14), (300, -11), (700, -7.5), (14300, 2)]


def pops(count=30, lead_db=-25.5):
    """Loud single bubbles, each amid a ragged cluster of weaker ones of like size."""
    peak_s, db, hz, cycles = np.array(POPS, float).T[:, :, None]
    is_weak = np.arange(count) > 0  # bubble 0 is the pop itself
    lag, size, pitch = rng.standard_normal((len(POPS), count, 3)).transpose(2, 0, 1) * is_weak
    trail_db = -20 + 0.4 * np.log2(hz / 1000)
    gains = gain_of(db + (lag > 0) * trail_db + (lag < 0) * lead_db + 3.65 * size)
    times = peak_s + 0.00297 * np.sign(lag) + .021 * lag + .013 * abs(lag)
    pitches = hz * np.exp(.075 * pitch)
    lengths = np.maximum(cycles, 1).repeat(count)
    sides = rng.choice([-1., 1.], len(POPS)).repeat(count)
    clusters = bubbles(times.ravel(), gains.ravel(), pitches.ravel(), lengths, sides, glide=.01)
    return equalise(clusters, POP_EQ)


# Stereo width, as EQ on the side channel: (frequency [Hz], gain [dB])
SIDE_EQ = [(100, -35), (250, -37), (700, -72), (3000, -80), (4000, -39), (5300, -10.5), (7500, -4.5),
           (14000, -3)]


def scene():
    """The pan sits in the centre over the low bed; only the treble spreads left and right."""
    hits = pops() + spatters()
    mid, side = sizzle() + hits + gain_of(-11) * echoes(hits, t60_s=.1)
    bed = hum() + rumble() + churn()
    return bed + mid + ringing(mid) + equalise(side, SIDE_EQ) * [[1], [-1]]


def record(dry):
    """A steep high cut at 14.35 kHz."""
    taps = signal.firwin(511, 14350, window=("kaiser", 9), fs=SR)
    return signal.oaconvolve(dry, taps[None], "same")


dry = scene()
out = record(dry)
wav_out(out)
```